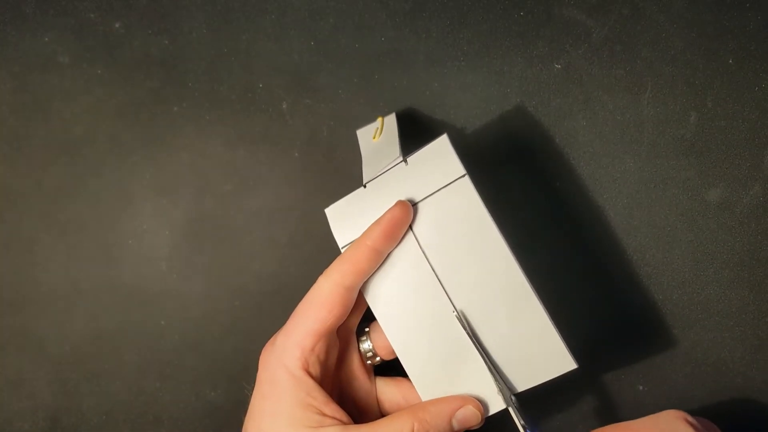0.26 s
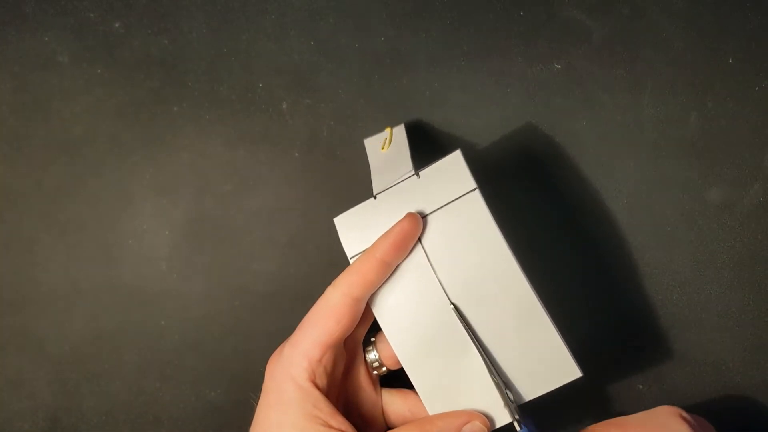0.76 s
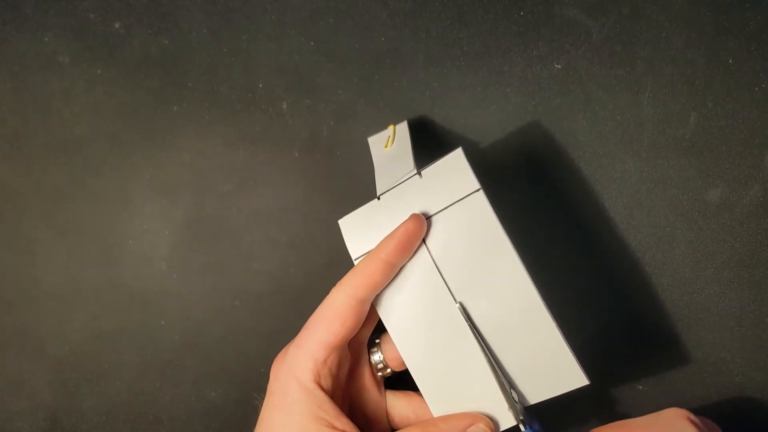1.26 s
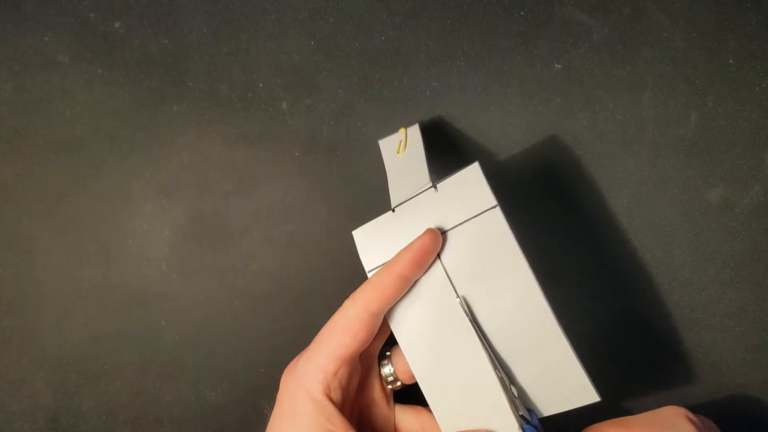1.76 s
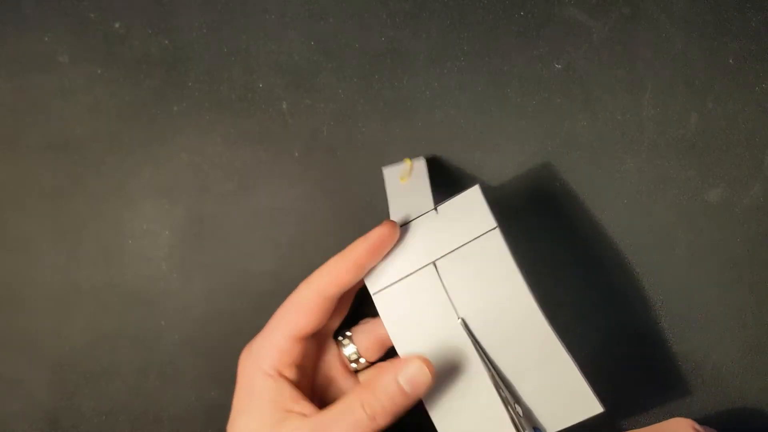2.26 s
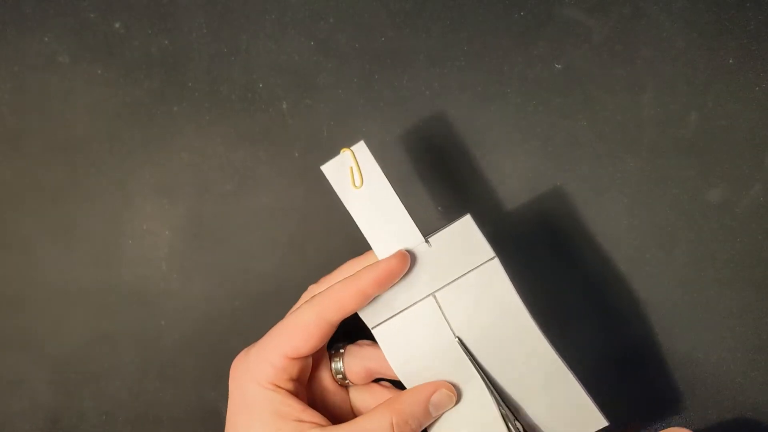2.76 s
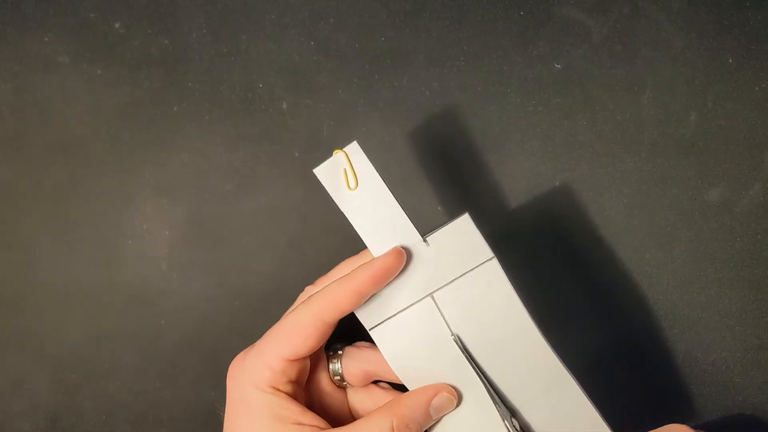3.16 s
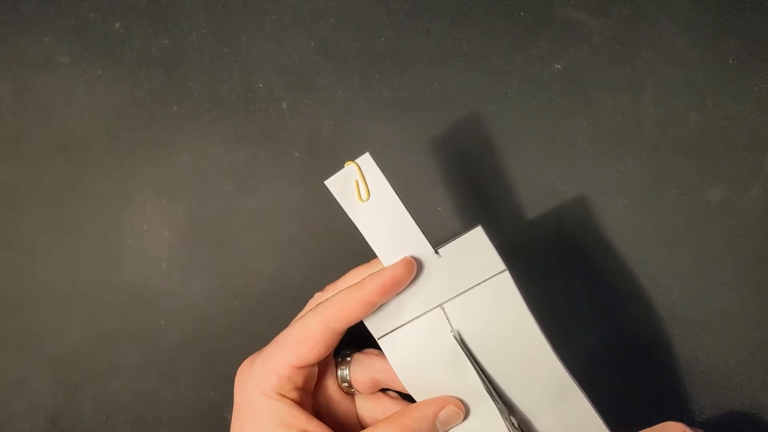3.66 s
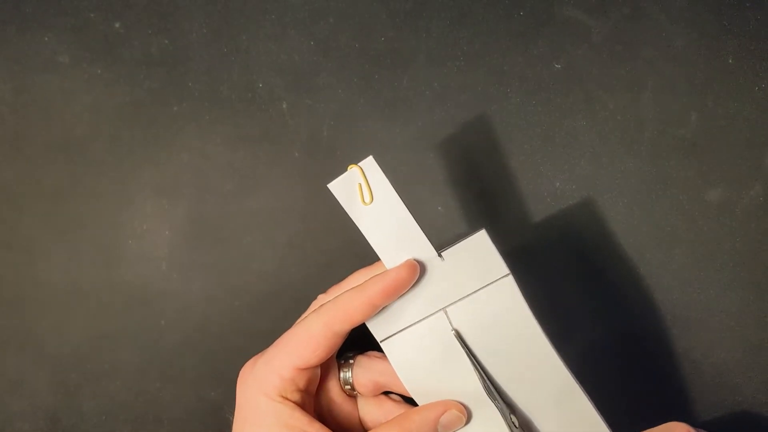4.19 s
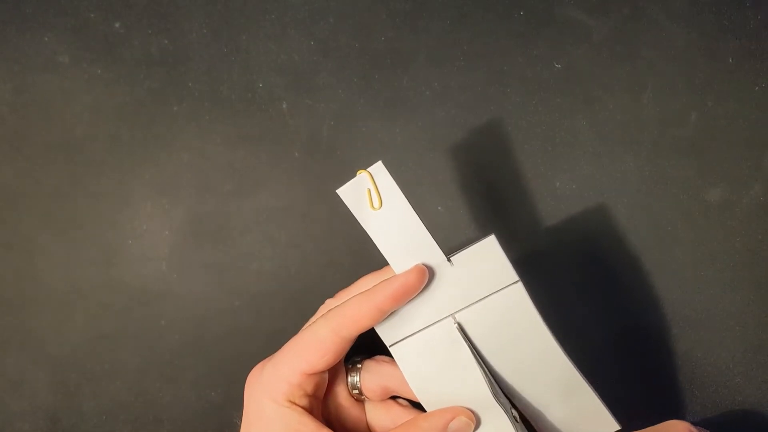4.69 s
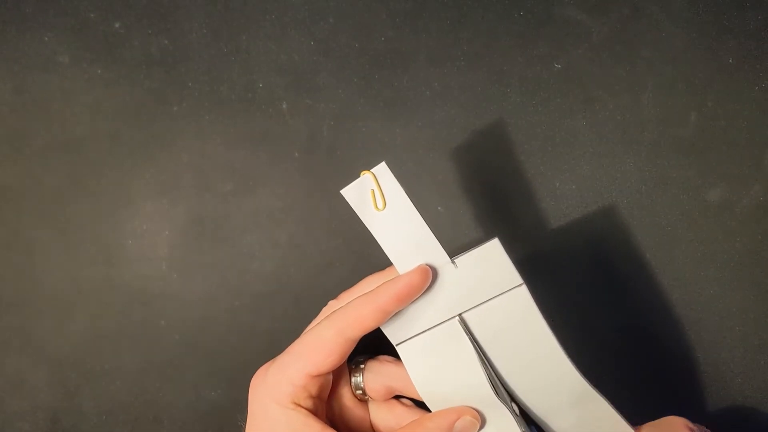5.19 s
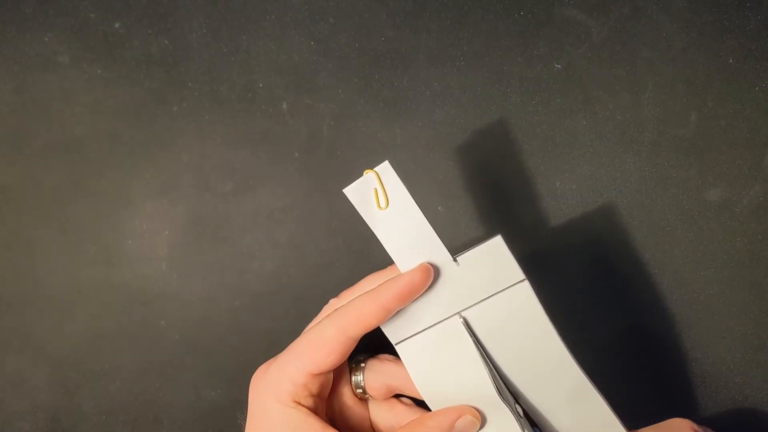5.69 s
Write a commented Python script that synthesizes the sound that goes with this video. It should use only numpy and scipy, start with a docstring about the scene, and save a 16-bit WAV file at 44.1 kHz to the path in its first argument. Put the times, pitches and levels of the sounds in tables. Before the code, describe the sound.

Scissors cut slowly through stiff paper, close to the microphone and slightly to the right, in a small room with a faint, steady low hum. Light rustles and clicks open, followed by a short steel scrape at 0.6 seconds as the blades part. A dry, crunching cut with crisp ticks comes at about 1 second, then another scrape and, at 1.5 seconds, the loudest sound, a sharp snap of the blades going through. Two small bites follow around 1.8 and 2 seconds. From 2.1 to 3 seconds the sheet rustles softly in the hand, with a sharp tick at 2.5. Cutting resumes from 3.3 to 4.7 seconds in short, uneven crunches, with faint scrapes and tiny pings where the blades catch. Scattered ticks and light rustles follow, and a last crisp cut comes near 5.9 seconds.

```python
"""Scissors through stiff paper

Scissors cut slowly into a folded sheet held over a table, close to a stereo microphone. Steel scrapes
as the blades open, the paper crunches as they close, and fibres snap in ticks. Now and then the blades
catch with a ping; once they slam through. The sheet rustles in the hand. Each of these is a swarm of tiny
impulses ringing in three bands (sheet, crack, fizz). A small room answers over a low, steady hum."""
import sys
import numpy as np
from scipy import signal
from scipy.fft import rfft, irfft, next_fast_len
from scipy.io import wavfile
from scipy.ndimage import map_coordinates

SR = 44100
rng = np.random.default_rng(int(sys.argv[2]) if len(sys.argv) > 2 else 0)


def waveform_to_disk(signal):
    """Save audio, clipped to [-1, 1], as 16-bit WAV at the path in sys.argv[1]."""
    frames = np.transpose(np.atleast_2d(signal))
    scaled = np.clip(frames, -1, 1) * 32767
    samples = np.round(scaled).astype(np.int16)
    wavfile.write(sys.argv[1], SR, samples)


N = 261720
CRACK_HZ = 3300  # reference pitch of paper's crack band

# the blades press slowly through the sheet: start/s, end/s, relative level/dB, brightness/dB per band
BITES = [(0.967, 1.231, -60, 0), (1.728, 1.846, -58, -1.5), (1.96, 2.066, -61.5, -2),
         (3.255, 3.425, -61.5, 3), (3.688, 3.743, -52.5, -3.5), (3.941, 4.15, -57.5, 0),
         (4.459, 4.686, -63, -1), (5.795, 5.936, -57, 1.5)]
# the broad, smooth spectrum of stiff paper: f/Hz, relative level/dB
PAPER_SPECTRUM = [(300, 4), (600, -0.5), (900, 1.5), (1250, -2.5), (1700, 3), (2200, -3.5), (2900, 7.5),
                  (5000, -2), (7000, -12.5), (10000, -16.5), (14000, -13.5), (16000, -22)]
# the spectrum of the scissors in the cut: f/Hz, relative level/dB
BLADE_SPECTRUM = [(300, -7), (520, -0.5), (740, -1), (950, 3), (1600, 2.5), (2100, -3), (3000, -2),
                  (4100, -10), (5100, 0.5), (6100, -4.5), (8000, -6.5), (12000, -12.5), (16000, -17)]
# the blades' resonances: f/Hz, width/Hz, lift/dB
BLADE_MODES = [(941, 90, 6), (1287, 30, 11), (1644, 150, 2.5), (2460, 340, 4), (3210, 210, 6.5),
               (4630, 420, 7), (8200, 600, -2.5)]


def blade_scrape():
    """The blades open, steel sliding on steel and paper; each stroke dulls as it goes."""
    # start/s, end/s, relative level/dB, brightness/dB per band
    strokes = [(0.619, 0.749, -43.5, 0.5), (1.362, 1.502, -45.5, 2.5), (3.597, 3.752, -51, 3),
               (4.278, 4.389, -53, 1.5), (4.905, 5.013, -56.5, -1)]
    rows = [(start, end, *band_levels(db, bright, crack_db=1.5, fizz_db=-8.5))
            for start, end, db, bright in strokes]
    return friction(rows, steel(), pans_db=(0, -6, -11), crack_hz=3550, drift_db=(2.5, -5, -1),
                    attack_s=.003, release_s=.0098, grain_hz=1700, grain_db=2,
                    clump_hz=160, clump_db=2.4, crackles_per_s=190, crackle_db=8.5)


def blade_catches():
    """The blades catch and jump, and the paper gives a brief ping."""
    # t/s, relative sheet, crack and fizz levels/dB, time scale/s, sheet f/Hz, crack f/Hz
    catches = [(0.4452, -25, -30.5, -35.5, 0.0026, 1046, 3100),
               (1.4359, -31, -35.5, -54, 0.0041, 1090, 3600),
               (3.4508, -39.5, -31.5, -42, 0.0014, 1410, 2880),
               (3.7516, -33.5, -27.5, -39.5, 0.0027, 1140, 2830),
               (4.7146, -41, -51.5, -80, 0.0032, 1180, 2590)]
    ping = voice(PAPER_SPECTRUM, sheet_focus_db=7, crack_focus_db=2.5)
    return snaps(catches, ping, pans_db=(0, -6, -14), rise=.25, fall=.5, creak_db=-26)


def blade_slam():
    """The blades slam through once and the sheet flaps after them."""
    # t/s, relative sheet, crack and fizz levels/dB, time scale/s, sheet f/Hz, crack f/Hz
    hits = [(1.5126, -26, -19.5, -19.5, 0.0017, 1107, 3600),
            (1.5195, -24.5, -28, -37.5, 0.0057, 1077, 2800), (1.523, -32, -26, -38, 0.0029, 1100, 3800)]
    return snaps(hits, steel(), pans_db=(5, -1.5, -13.5), rise=.5, fall=.8, creak_db=-20)


def fibre_snaps():
    """Paper fibres snap in sharp ticks, with weaker ones scattered through each bite."""
    # t/s, relative level/dB, brightness/dB per band, time scale/s
    loud_ticks = [(0.1132, -46.5, -4, 0.0066), (0.392, -51, -1, 0.0062), (0.4276, -42.5, 1.5, 0.007),
                  (1.072, -54.5, 1.5, .0014), (1.1026, -47.5, -2, 0.0053), (1.1524, -53.5, -12.5, .008),
                  (1.1685, -39.5, 0.5, 0.0053), (1.2127, -43.5, 2.5, 0.0081), (1.4217, -37, 1, 0.0034),
                  (1.785, -51, -1, 0.0014), (1.8122, -43.5, -3.5, 0.0038), (1.8173, -37, -2.5, 0.0014),
                  (1.951, -51.5, 1, 0.0022), (1.9706, -50, 1.5, 0.0036), (1.992, -48, 0.5, 0.0014),
                  (2.008, -57.5, 2, .003), (2.0327, -41.5, -1, 0.009), (2.1648, -44, -3.5, 0.006),
                  (2.252, -44.5, -3, .008), (2.278, -46.5, 8.5, 0.0045), (2.396, -51, -7, 0.0063),
                  (2.5112, -32, 2, 0.0042), (3.312, -49.5, 12, 0.0016), (3.325, -44, 10, 0.0031),
                  (3.4166, -55, 6, 0.0025), (3.5355, -40, 5.5, 0.0017), (3.705, -46, -4, 0.0083),
                  (3.7462, -37.5, -1.5, 0.0032), (3.948, -53.5, 3.5, 0.0015), (4.0003, -43, -0.5, 0.0047),
                  (4.0097, -38, 0.5, 0.0077), (4.066, -41.5, -2, 0.0036), (4.0954, -45.5, -3.5, 0.0024),
                  (4.1477, -40.5, -3.5, 0.0087), (4.374, -51, -4.5, .0021), (4.4782, -49, -4, 0.0013),
                  (4.5718, -44, -4.5, .0011), (4.6183, -44.5, -2.5, 0.018), (4.66, -43.5, 2, 0.0024),
                  (4.9237, -54, -12, 0.0022), (5.0542, -40, 0, 0.0018), (5.1841, -44, 2.5, .0024),
                  (5.77, -48.5, -6, 0.0033), (5.844, -46, -5.5, 0.0047), (5.8836, -37, -1.5, 0.0041),
                  (5.917, -32.5, 1, .007)]
    fibres = voice(PAPER_SPECTRUM, sheet_focus_db=3, crack_focus_db=1.5)
    rows = []
    for s, db, bright, length in loud_ticks + weak_fibres():
        levels_db = band_levels(db, bright, crack_db=-.03, fizz_db=-5.5)
        crack_hz = CRACK_HZ * 2 ** (-2 * bright)  # two octaves down per dB of brightness
        rows.append((s, *levels_db, length, span_hz(s), crack_hz))
    return snaps(rows, fibres, pans_db=(-.39, -5, -17), rise=.35, fall=.75, creak_db=-23)


def weak_fibres(per_s=16, lift_db=7, scatter_db=4, length_s=.002):
    """Weak fibres give way at uneven intervals during each bite: a list of small ticks."""
    ticks = []
    for start, end, db, bright in BITES:
        count = max(round((end - start) * per_s), 1)
        for k, (jitter, size, colour) in enumerate(rng.uniform(-1, 1, (count, 3))):
            s = start + (end - start) * (k + .5 + jitter / 2) / count
            ticks.append((s, db + lift_db + scatter_db * size, bright + scatter_db * colour, length_s))
    return ticks


def paper_crunch():
    """The blades crunch through the paper; the sheet band swells as the pressure builds."""
    edge = voice(PAPER_SPECTRUM, sheet_focus_db=0, crack_focus_db=-4, low_cut_ratio=.45)
    rows = [(start, end, *band_levels(db, bright, crack_db=1, fizz_db=-3.5))
            for start, end, db, bright in BITES]
    return friction(rows, edge, pans_db=(-1, -5, -19), crack_hz=CRACK_HZ, drift_db=(4, -.5, -1.5),
                    attack_s=.0072, release_s=.01, grain_hz=1600, grain_db=3.5,
                    clump_hz=120, clump_db=4, crackles_per_s=40, crackle_db=15)


def paper_rustle():
    """The held sheet flexes and slides under the fingers, crackling softly."""
    # start/s, end/s, relative level/dB, brightness/dB per band
    rustles = [(.07, 0.176, -59, 2.5), (0.203, 0.45, -64, 1), (0.839, 0.881, -59.5, -3),
               (2.123, 2.427, -57.5, 1.5), (2.311, 2.35, -67, 16.5), (2.42, 2.761, -63.5, 4),
               (2.76, 2.952, -60, 4), (2.516, 2.619, -53, 4), (2.945, 3.15, -72.5, 4),
               (3.462, 3.59, -63.5, 7), (5.133, 5.21, -64, 1.5), (5.334, 5.427, -61, 0),
               (5.574, 5.608, -60.5, -3.5)]
    surface = voice(PAPER_SPECTRUM, sheet_focus_db=2.6, crack_focus_db=-1.5)
    rows = [(start, end, *band_levels(db, bright, crack_db=-.95, fizz_db=-6.5))
            for start, end, db, bright in rustles]
    return friction(rows, surface, pans_db=(-1, -5, -19), crack_hz=CRACK_HZ, drift_db=(0, 0, 0),
                    attack_s=.0077, release_s=.012, grain_hz=1000, grain_db=-1,
                    clump_hz=70, clump_db=4, crackles_per_s=70, crackle_db=14)


def snaps(rows, body, pans_db, rise, fall, creak_db):
    """Each snap is a short avalanche of fractures: a faint creak, a steep rise, a quick fall."""
    track, lead_s = np.zeros((2, N)), .008
    t = np.arange(SR // 30) / SR - lead_s
    for s, *levels_db, length, sheet_hz, crack_hz in rows:
        avalanche = np.exp(-np.abs(t) / (length * np.where(t < 0, rise, fall)))
        creak = amp(creak_db) * np.exp(-np.abs(t) / .002)
        snap = radiate(avalanche + creak, body(sheet_hz, crack_hz), levels_db, pans_db, seconds=.006)
        add(track, s - lead_s - .0004, snap)
    return track


def friction(rows, body, pans_db, crack_hz, drift_db, attack_s, release_s,
             grain_hz, grain_db, clump_hz, clump_db, crackles_per_s, crackle_db):
    """Sliding contact catches and lets go: tiny grains in clumps, and single fibres that crackle."""
    track = np.zeros((2, N))
    for start, end, *levels_db in rows:
        seconds = end - start
        n = round(seconds * SR)
        t = np.arange(n) / SR
        gate = np.clip(np.minimum(t / attack_s, (seconds - t) / release_s), 0, 1)
        band_drift = amp(np.outer(drift_db, t / seconds))
        grains = amp(grain_db * wobble(grain_hz, n) + clump_db * np.tanh(wobble(clump_hz, n)))
        breaks = (rng.random(n) < crackles_per_s / SR) * rng.uniform(.31, 1, n)
        crackle = signal.lfilter([1], [1, -np.exp(-1 / (.0005 * SR))], breaks)  # 0.5 ms decay
        force = gate * band_drift * (grains + amp(crackle_db) * crackle)
        rings = body(span_hz((start + end) / 2), crack_hz)
        add(track, start, radiate(force, rings, levels_db, pans_db, seconds))
    return track


def radiate(force, rings, levels_db, pans_db, seconds, coherence=(.9, .65, .6), lag_samples=5):
    """Random fractures ring each band, reaching the right side first; a positive pan leans left."""
    stereo, n = 0, force.shape[-1]
    pushes = np.broadcast_to(force, (len(rings), n))
    for push, response, db, pan_db, share in zip(pushes, rings, levels_db, pans_db, coherence):
        common, separate = rng.standard_normal(n), rng.standard_normal((2, n))
        fractures = push * (np.sqrt(share) * common + np.sqrt(1 - share) * separate)
        band = signal.fftconvolve(fractures, response[None], axes=1)
        band *= np.sqrt(seconds * SR / np.sum(band ** 2, axis=1, keepdims=True))  # rms 1 over `seconds`
        pan = unit(amp([[pan_db / 2], [-pan_db / 2]]))
        stereo = stereo + amp(db) * pan * band
    left, right = stereo
    return np.array([np.pad(left, (lag_samples, 0))[:-lag_samples], right])


def steel():
    """The voice of the scissors, coloured by the blades' resonances."""
    return voice(BLADE_SPECTRUM, sheet_focus_db=0, crack_focus_db=3, modes=BLADE_MODES)


def voice(spectrum, sheet_focus_db, crack_focus_db, modes=(), low_cut_ratio=.34):
    """How one object rings in the three bands, as a function of its sheet and crack pitch."""
    # sheet (mids), crack (presence) and fizz (top): low f/Hz, high f/Hz
    band_edges = [(300, 1900), (2100, 6000), (6200, 15500)]
    sheet, crack, fizz = band_edges
    fizz_ring = ring(spectrum, modes, fizz, fizz[0], focus_db=0)

    def rings(sheet_hz, crack_hz):
        # a short, stiff span of paper cannot radiate far below its own pitch
        low_hz = max(sheet[0], low_cut_ratio * sheet_hz)
        return [ring(spectrum, modes, (low_hz, sheet[1]), sheet_hz, sheet_focus_db),
                ring(spectrum, modes, crack, crack_hz, crack_focus_db), fizz_ring]
    return rings


def ring(spectrum, modes, band, centre_hz, focus_db, size=1024):
    """One tiny fracture rings within a band; positive focus favours centre_hz, negative scoops it."""
    hz = np.fft.rfftfreq(size, 1 / SR) + 1
    resonances_db = sum(lift / (1 + (2 * (hz - f) / width) ** 2) for f, width, lift in modes)
    off_centre_db = focus_db * np.log1p((3 * np.log2(hz / centre_hz)) ** 2)
    band_pass = 1 / np.sqrt((1 + (band[0] / hz) ** 10) * (1 + (hz / band[1]) ** 10))
    gain = amp(along(spectrum, hz) + resonances_db - off_centre_db) * band_pass
    # minimum phase keeps the attack sharp, with no ringing ahead of it
    cepstrum = irfft(np.log(gain + 1e-5))
    cepstrum[1:size // 2] *= 2
    cepstrum[size // 2 + 1:] = 0
    return irfft(np.exp(rfft(cepstrum)))


def span_hz(s):
    """Pitch of the free span of paper: lower as the cut lengthens, higher when the grip tightens."""
    # t/s, f/Hz
    span_pitch = [(0.1, 1380), (1.1, 1050), (2.5, 1300), (3.53, 1350), (3.7, 804), (4.1, 850), (4.95, 1003),
                  (5.06, 804), (5.2, 1210), (5.84, 1010), (5.91, 1570)]
    return np.interp(s, *np.transpose(span_pitch))


def band_levels(db, bright_db, crack_db, fizz_db):
    """Levels of the sheet, crack and fizz bands: brightness tilts them about the middle one."""
    return db - bright_db, db + crack_db, db + bright_db + fizz_db


def room(source, wet_db, treble_db, early_db, crossfeed=.23, directions=1):
    """The source sends different fine detail in each direction; echoes carry some of each side across."""
    rays = [source() for _ in range(directions)]
    echoes = 0
    for ray in rays:
        send = 1.09 * ray + crossfeed * ray[::-1]
        echoes = echoes + signal.oaconvolve(send, reflections(wet_db, treble_db, early_db), axes=1)[:, :N]
    return rays[0] + echoes / np.sqrt(directions)


def reflections(wet_db, treble_db, early_db, count=24):
    """The table and near walls echo within 21 ms over a diffuse tail that dies by frequency."""
    # f/Hz, time to fall 60 dB/s
    decay_times = [(200, 0.38), (1000, 0.32), (4000, 0.38), (9000, 0.38), (16000, 0.28)]
    hz, t, noise = signal.stft(rng.standard_normal((2, SR // 2)), SR, nperseg=256)
    decay = amp(-60 * t / along(decay_times, hz)[:, None])
    tail = signal.istft(noise * decay, SR, nperseg=256)[1]
    tail *= 1 - np.exp(-np.arange(tail.shape[1]) / SR / .0014)  # soft onset
    tail *= amp(wet_db) / np.linalg.norm(tail[0])
    for side in tail:
        delays_s = rng.uniform(.003, .021, count)
        taps = amp(early_db) * rng.choice([-1, 1], count) * np.exp(-delays_s / .022)
        side[(delays_s * SR).astype(int)] += taps
    # long waves reach both sides alike
    tail += filtered(tail[0] - tail, lambda f: 1 / (1 + (f / 900) ** 2))
    treble_shelf = [(1200, .0033), (3000, treble_db / 2), (12000, treble_db)]
    return filtered(tail, lambda f: amp(along(treble_shelf, f)))


def room_tone():
    """Low rumble and a wavering hum sit in the centre under faint, wide hiss."""
    # noise floor: f/Hz, relative level/dB
    air_spectrum = [(20, -43.5), (35, -21.5), (55, -7.5), (85, -9.5), (125, -2.5), (170, -8.5), (240, -6.5),
                    (330, -10), (480, -10), (700, -18.5), (1300, -22), (2500, -30), (7000, -36),
                    (16000, -47.5)]
    # hum partials: f/Hz, relative level/dB
    hum_partials = [(107.7, -61), (204.6, -74), (242.2, -64.5), (317.6, -71), (360.7, -69), (484.5, -70.5)]
    coherence = [(100, .9), (350, .74), (1000, .12), (3000, .05)]  # f/Hz, left-right correlation

    def mid_side_gains(hz):
        width = np.arccos(along(coherence, hz)) / 2
        return amp(along(air_spectrum, hz)) * [np.cos(width), np.sin(width)]
    mid, side = filtered(rng.standard_normal((2, N)), mid_side_gains)
    t = np.arange(N) / SR
    hum = 0
    for hz, db in hum_partials:
        level = np.sqrt(2) * amp(db + 1.5 * wobble(3.7, N))
        hum = hum + level * np.sin(2 * np.pi * hz * t + 1.2 * wobble(10, N))
    return amp(-58.5) * unit(np.array([mid + side, mid - side])) + amp(-4) * hum


def amp(db):
    """Decibels to gain."""
    return 10 ** (np.asarray(db) / 20)


def unit(x):
    """x at rms 1."""
    return x / np.sqrt(np.mean(x ** 2) + 1e-20)


def along(points, hz):
    """A curve through (f/Hz, value) points on a log frequency axis."""
    f, values = np.transpose(points)
    return np.interp(np.log(hz + 1), np.log(f + 1), values)


def filtered(x, response):
    """x through an EQ whose gain is response(hz)."""
    n = x.shape[-1]
    size = next_fast_len(n + 8192)
    return irfft(rfft(x, size) * response(np.fft.rfftfreq(size, 1 / SR)), size)[..., :n]


def wobble(rate, n):
    """A smooth random curve, rate knots a second."""
    knots = rng.standard_normal(int(n * rate / SR) + 4)
    return map_coordinates(knots, [np.arange(n) * rate / SR])


def add(track, s, x):
    """Mix x into the track from time s."""
    part = track[:, max(round(s * SR), 0):][:, :x.shape[-1]]
    part += x[:, :part.shape[-1]]


def scene():
    """Blades and paper, each with its own send to the room, over the room tone."""
    scrape = room(blade_scrape, wet_db=-8, treble_db=-1, early_db=-19, directions=2)
    catches = room(blade_catches, wet_db=-8, treble_db=-3, early_db=-17.5, directions=3)
    slam = room(blade_slam, wet_db=-8, treble_db=-2, early_db=-23, crossfeed=.3, directions=4)
    ticks = room(fibre_snaps, wet_db=-7, treble_db=-6, early_db=-19, crossfeed=.053)
    paper = room(lambda: paper_crunch() + paper_rustle(),
                 wet_db=-7.5, treble_db=-4, early_db=-31, crossfeed=.14)
    return scrape + amp(-1) * catches + slam + amp(-1.5) * ticks + amp(-1) * paper + room_tone()


def record(dry):
    """A steep high cut takes off the very top."""
    cutoff_hz, fade_hz = 15950, 300
    return filtered(dry, lambda hz: np.clip((cutoff_hz - hz) / fade_hz + .5, 0, 1))


dry = scene()
out = record(dry)
waveform_to_disk(out)
```